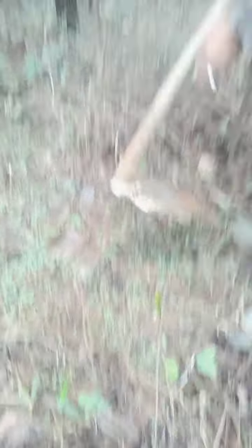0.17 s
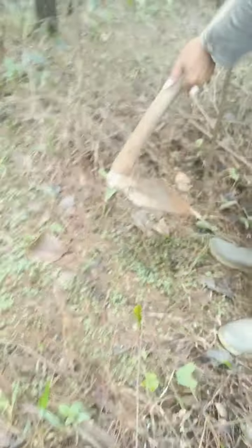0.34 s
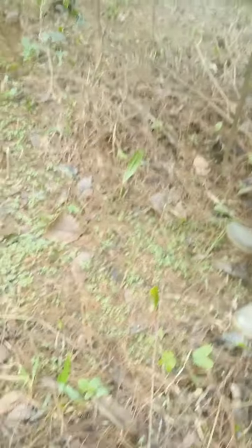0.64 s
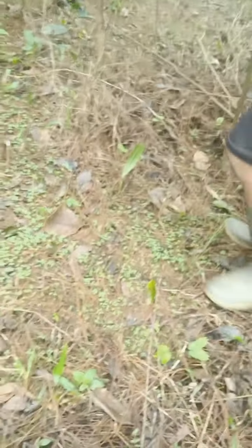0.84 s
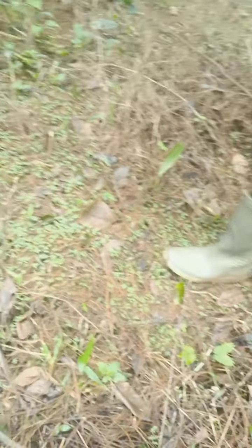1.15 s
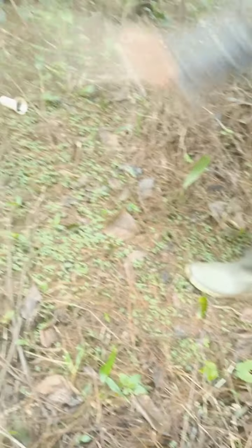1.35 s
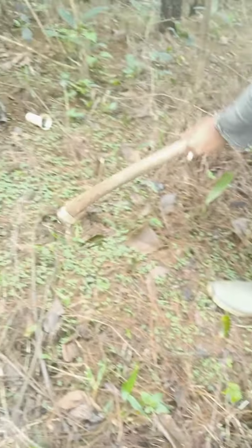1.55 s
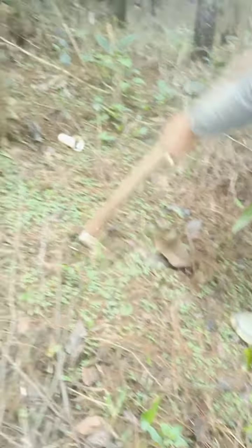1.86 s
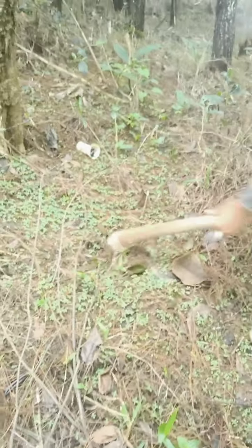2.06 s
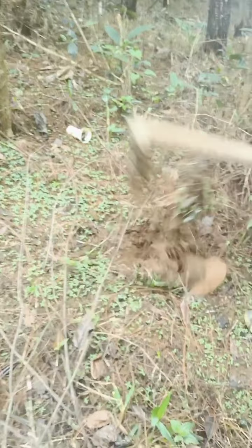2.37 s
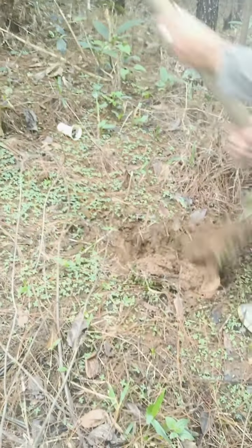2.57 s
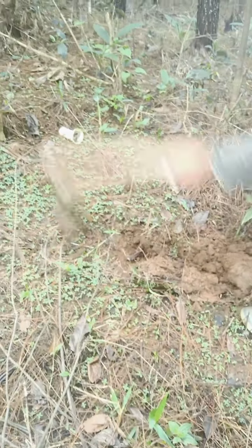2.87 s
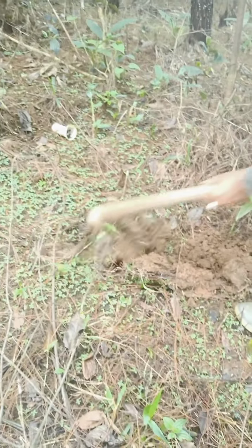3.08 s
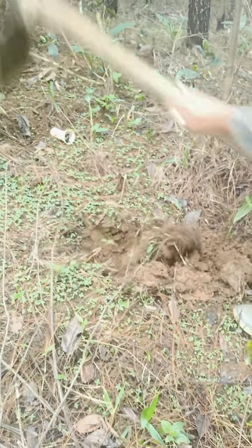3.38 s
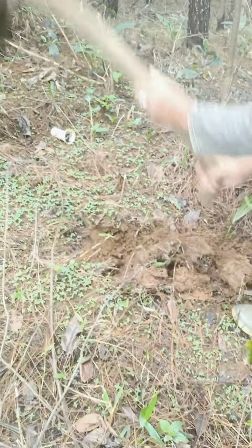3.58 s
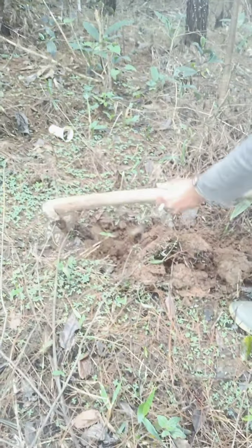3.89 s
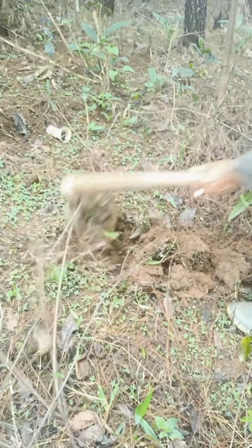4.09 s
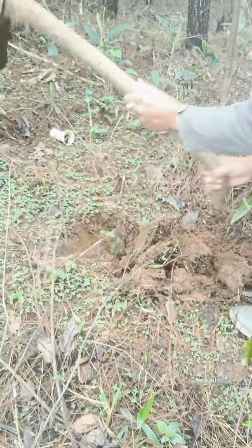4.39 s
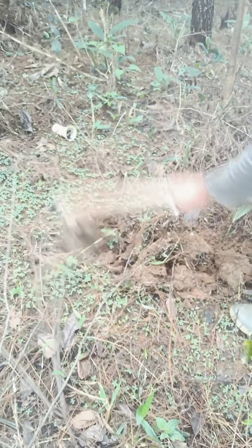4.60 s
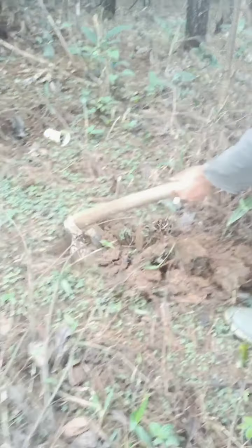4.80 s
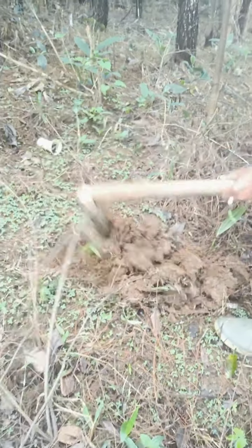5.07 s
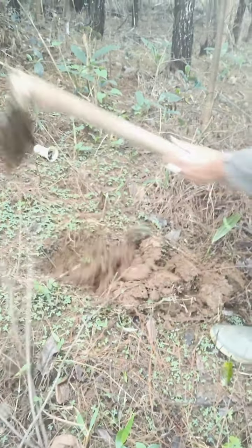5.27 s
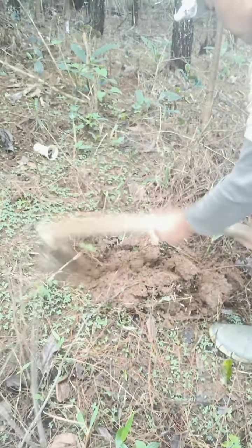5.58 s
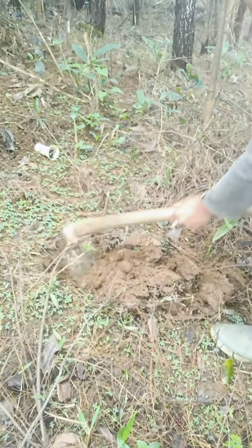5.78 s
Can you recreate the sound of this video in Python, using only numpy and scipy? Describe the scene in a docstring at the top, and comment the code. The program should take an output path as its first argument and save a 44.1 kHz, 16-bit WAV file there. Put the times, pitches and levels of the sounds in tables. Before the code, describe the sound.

Outdoors in quiet woodland, heard close up on a phone. For the first second there is only light, dry rustling of litter with a few tiny twig ticks, over a soft hush and a small engine puttering low and faint in the distance, its hum wavering. A faint thump at 1.0 s and a thin airy swish lead to the first hoe blow at 1.3 s: a loud, sharp crack of grit with a dull thud and brief damped metallic ring. Soil drags and crumbs trickle around 2.0 to 2.5 s. A second heavy, crunchy chop lands at 2.8 s, with pebbles scattering and a snap at 3.4 s. Another gritty chop comes at 3.6 s, then one at 4.55 s with bright twig snaps, the second at 4.65 s. Earth scrapes and slides around 5.0 s. A weaker, crumbly double blow falls at 5.5 s, followed by small ticks and a last fizz of grit at 5.9 s.

```python
"""A hoe chops dry soil in woodland, close to a phone: bursts of cracking grit over dull, ringing thuds.
Between chops, slides of noise and grains drag and trickle, and twigs snap with a few cycles of their own pitch.
A swish of band-limited noise comes before the first full chop.
Far away a small engine putters as a train of puffs, with a wavering low hum, over the steady hush of the wood."""
import sys
import numpy as np
from scipy import signal
from scipy.fft import rfft, irfft, next_fast_len
from scipy.io import wavfile
from scipy.ndimage import uniform_filter1d, map_coordinates

SR = 44100
rng = np.random.default_rng(int(sys.argv[2]) if len(sys.argv) > 2 else 0)


def unload_audio(sound):
    """Save the sound as a 16-bit wav file, at the path given as the first command line argument."""
    columns = np.transpose(np.atleast_2d(sound))
    # keep every value between -1 and 1, then stretch to whole-number steps
    steps = np.round(np.clip(columns, -1, 1) * 32767)
    wavfile.write(sys.argv[1], SR, steps.astype(np.int16))


N = 261954


def amp(db):
    """Gain of a level in dB."""
    return 10 ** (np.asarray(db) / 20)


def unit(x):
    """x at rms 1."""
    return x / np.sqrt(np.mean(x ** 2) + 1e-20)


def along(points, hz):
    """Value at hz of (hz, value) points, interpolated on a log axis."""
    f, v = np.transpose(points)
    return np.interp(np.log(hz + 1), np.log(f + 1), v)


def curves(rows):
    """One value per sample for each column after the time."""
    s, *cols = np.transpose(rows)
    return [np.interp(np.arange(N) / SR, s, c) for c in cols]


def wobble(rate):
    """A smooth random curve, rate knots a second."""
    knots = rng.standard_normal(int(N * rate / SR) + 4)
    return map_coordinates(knots, [np.arange(N) * rate / SR])


def swell(start, length, rise_db, fall_db):
    """Gain that climbs rise_db a second to the start, holds, then drops fall_db a second."""
    t = np.arange(N) / SR
    early, late = np.maximum(start - t, 0), np.maximum(t - start - length, 0)
    return amp(-rise_db * early - fall_db * late)


def filtered(x, response):
    """x times a complex response of frequency."""
    m = next_fast_len(N + 8192)
    return irfft(rfft(x, m) * response(np.fft.rfftfreq(m, 1 / SR)), m)[..., :N]


def resonant(x, modes):
    """x through causal resonances (hz, width_hz, level_db), scaled so that white noise keeps its rms."""
    def shape(f):
        total = 0
        for k, (centre, width, db) in enumerate(modes):
            peak = 1j * f * width / (centre * centre - f * f + 1j * f * width)
            total = total + (-1) ** k * amp(db) * peak  # neighbours have opposite sign
        return total

    power = np.mean(np.abs(shape(np.linspace(0, SR / 2, 4096))) ** 2)
    return filtered(x, shape) / np.sqrt(power)


def spread(pair, alike):
    """Left and right from a shared and an opposed signal, as alike as the table says."""
    def weights(hz):
        turn = np.arccos(np.clip(along(alike, hz), -1, 1)) / 2
        return np.array([np.cos(turn), np.sin(turn)])

    mid, side = filtered(pair, weights)
    return np.array([mid + side, mid - side])


def ports(x):
    """A near sound reaches the two microphone ports with its own colour and lead."""
    # how far the left port leads the right: hz, lead_rad
    port_lead = [(0, 3.5), (3010, -1.5), (6630, -1), (7410, 0), (12800, 5), (13900, 6), (15800, 1),
                 (16400, -9)]
    # left port over right: hz, balance_db
    port_balance = [(60, 13), (150, -4), (380, 5), (950, -4), (2380, 1), (5980, -2), (15000, 8)]

    def pair(hz):
        left = amp(along(port_balance, hz) / 2) * np.exp(.5j * along(port_lead, hz))
        return left ** np.array([[1], [-1]])  # the right port gets the inverse half

    return filtered(x, pair)


def gritty(hollow, crunch, fizz):
    """Three excitations, each ringing its own resonances; all but the fizz lose their treble."""
    # clods and handle: hz, width_hz, relative_db
    hollow_modes = [(508, 440, -7.5), (705, 164, 3.5), (860, 358, 0)]
    # crunching grit: hz, width_hz, relative_db
    crunch_modes = [(1744, 1010, -1), (2550, 770, 8.5), (3970, 560, 2.5), (5310, 1880, 1)]
    # finest grit: hz, width_hz, relative_db
    fizz_modes = [(7680, 5400, -4.5), (11520, 1660, 2), (14100, 2850, 0)]
    coarse = resonant(hollow, hollow_modes) + resonant(crunch, crunch_modes)
    # crumbly earth has little above this corner
    soft = lambda hz: 1 / (1 - (hz / 6800) ** 2 + 1.2j * hz / 6800) ** 2
    return filtered(coarse, soft) + resonant(fizz, fizz_modes)


def hush():
    """The far, steady noise of the wood, shaped in spectrum and width."""
    # spectrum before levelling: hz, relative_db_per_hz
    spectrum = [(18, -21), (30, -3), (48, -11), (91, -5), (332, -7.5), (409, -10.5), (904, -15.5),
                (1270, -19), (2470, -15.5), (3480, -24), (6050, -25), (9730, -41.5), (13700, -31.5),
                (15200, -36.5), (16500, -65)]
    # left-right likeness: hz, likeness
    alike = [(60, 0.52), (180, 0.93), (550, 0.51), (1650, 0.033), (4970, 0.019), (15000, 0.03)]
    noise = filtered(rng.standard_normal((2, N)), lambda hz: amp(along(spectrum, hz)))
    return amp(-58.5 + 0.095 * wobble(3.6)) * unit(spread(noise, alike))


def engine():
    """Far off, one puff for each firing rings the exhaust, with noise gated by the same puffs."""
    # engine speed before a slight unsteadiness: time_s, firings_per_s
    firing = [(0, 34.2), (.7, 35.8), (1.25, 35.1), (1.8, 33.9), (2.6, 36.7), (3.0, 38.2), (3.5, 38.7),
              (4.0, 39.9), (5.4, 37.5), (5.94, 33)]
    # level before the microphone: time_s, level_db
    loudness = [(0, -53), (.8, -57), (2.3, -58), (3.5, -61), (4.8, -62), (5.4, -58.5), (5.94, -62)]
    # exhaust resonances: hz, width_hz, relative_db
    exhaust = [(79.4, 17.4, -2), (137.4, 23.7, -1.5), (200, 78, -8), (331, 33, -2.5)]
    (rate,), (level_db,) = curves(firing), curves(loudness)
    turns = np.cumsum(rate * (1 + .003 * wobble(9))) / SR
    fired = np.diff(np.floor(turns), prepend=0) * amp(rng.standard_normal(N))
    gate = np.exp(-(turns % 1) / 0.57)  # falls from each firing to the next
    rough = unit(resonant(gate * rng.standard_normal(N), exhaust))
    return amp(level_db) * unit(unit(resonant(fired, exhaust)) + 0.3 * rough)


def hum():
    """A low sine tone that wavers in pitch and strength."""
    # tone before its random wavering in level: time_s, pitch_hz, level_db
    tone = [(0, 86.3, -62), (1.2, 85, -67), (1.85, 97, -63), (2.05, 86, -66.5), (3.8, 95.1, -75),
            (4.7, 89, -68), (5.94, 87, -64)]
    hz, level_db = curves(tone)
    strength = np.sqrt(2) * amp(level_db + 1.1 * wobble(9))
    return strength * np.sin(2 * np.pi * np.cumsum(hz) / SR)


def ticks():
    """Twigs and pebbles: one sharp snap, a few cycles of the piece's own pitch and a wisp of grit."""
    # single pieces, parts relative to level: start_s, level_db, pitch_hz, crunch_db, hollow_db, fizz_db
    pieces = [(0.0516, -39.5, 2760, 0.5, -7, -16), (0.1162, -37.5, 5170, -1.5, -5, -18),
              (0.6664, -41, 2600, 4, -14, -1), (0.7612, -37.5, 2290, -5, -22, -19),
              (1.9111, -42.5, 2500, -12, -5, -21), (1.9764, -32, 2820, -6, -20, -26),
              (1.9816, -36.5, 2450, 1, -21, -15), (2.615, -30.5, 2180, 3.5, -22, -11),
              (2.787, -25.5, 2820, -0.5, -7.5, -12), (3.243, -28, 2300, 0.5, -10, -1),
              (3.4115, -18.5, 2420, -1.5, -13, -7), (3.4164, -34, 2550, -3, -20, -22),
              (3.454, -45, 2070, -2, -10, -4), (3.838, -43.5, 940, 2.5, -5, -20),
              (3.879, -46, 1030, 2, -3, -20), (3.9005, -40, 2500, -1, -8, -16),
              (3.9313, -38, 2020, 8, 0, -10), (4.1918, -37.5, 2400, 4.5, -22, -16),
              (4.5517, -11, 1950, -17, -19, -33), (4.6, -39, 2400, 2, -15, -22),
              (4.643, -45, 2220, -2, -3, -29), (4.65, -10.5, 2050, -8.5, -12, -33),
              (4.668, -45, 2200, -5, -1, -25), (4.7052, -40, 2000, -2, 5, -24),
              (5.6575, -39.5, 2470, 0, -11, -14), (5.8157, -44.5, 2730, 2, -10, -15),
              (5.8494, -39.5, 1450, -13, 6, -22), (5.8613, -32.5, 2730, -9, 1, -28)]
    wisp_t60_s, pan_db = .012, 0.5  # pan: left over right
    ring_cycles, sharper_per_db = 28, .022  # cycles to fall 60 dB at -35 dB; share lost per dB louder
    drive, rings = np.zeros((3, 1, N + SR)), np.zeros((1, N + SR))
    t = np.arange(SR // 16) / SR
    fade = amp(-60 * t / wisp_t60_s)
    for s, db, hz, crunch_db, hollow_db, fizz_db in pieces:
        wisp = 0.49 * rng.standard_normal(len(t)) * fade
        wisp[0] = 0.64  # the snap itself
        parts = amp([hollow_db, crunch_db, fizz_db])[:, None, None]
        drive[:, :, round(s * SR):][..., :len(t)] += parts * amp(db) * wisp
        cycles = ring_cycles * np.clip(1 - sharper_per_db * (db + 35), .2, 2)
        decay = 0.85 * amp(db - 60 * t * hz / cycles)
        ring = decay * (1 - np.exp(-t / 0.00015)) * np.sin(2 * np.pi * hz * t)
        rings[:, round(s * SR):][:, :len(t)] += ring
    pan = amp(np.array([[pan_db], [-pan_db]]) / 2)
    return pan * ports(gritty(*drive[..., :N]) + rings[:, :N])


def patchy(x):
    """x with brief random patches of louder and softer gain across time and frequency."""
    z = signal.stft(x, nperseg=256)[2]
    field = rng.standard_normal(z.shape[1:])
    for axis in (0, 1):  # frequency, then time
        field = uniform_filter1d(field, size=6, axis=axis)
    return signal.istft(z * amp(3 * unit(field)), nperseg=256)[1][:, :N]


def soil():
    """Uneven grains patter over a finer slide of dust; about 120 sharper crumb clicks a second stand out."""
    # soil and litter on the move: start_s, length_s, crunch_db, hollow_db, fizz_db
    # (the last two relative to the crunch)
    slides = [(0.155, 0.53, -59, -8, -10.5), (0.71, 0.26, -62.5, -11, -9.5),
              (1.377, 0.015, -49.5, -4.5, -17), (1.522, 0.095, -52, -6.5, -14),
              (2.031, 0.13, -55, -9, -11.5), (2.296, 0.06, -52, -11.5, -21), (2.321, .01, -47.5, -6.5, -12),
              (2.42, 0.14, -55, 3, -33), (2.524, 0.034, -44.5, -8.5, -18.5), (2.608, 0.5, -57, -10.5, -12),
              (3.184, .14, -64.5, -16, -12), (3.39, .01, -60.5, -1, -19), (3.69, .02, -56, -12, -8),
              (3.837, 0.15, -58.5, -3, -15), (4.02, 0.26, -57, -12.5, -11), (4.61, 0.044, -60.5, -10, -14),
              (4.819, 0.065, -54, -9.5, -13.5), (5.002, 0.13, -54, -9, -12), (5.22, 0.2, -60, -10, -10),
              (5.5, 0.041, -58, -4, -11.5), (5.79, .08, -63.5, -3.5, -7), (5.92, .05, -53, -16, -25)]
    # left-right likeness of the patter: hz, likeness
    alike = [(300, 1), (700, 0.15), (2500, 0.12), (7000, 0.04), (15000, 0.033)]
    gather_db_per_s, settle_db_per_s = 139, 130
    # steady rate; crumbs swell and fade in level with the slides
    crumbs_per_s, crumb_db, crumb_spread_db = 120, 12, 2
    power = 0
    for s, length, db, hollow_db, fizz_db in slides:
        parts = amp(db + np.array([[hollow_db], [0], [fizz_db]]))
        power = power + (parts * swell(s, length, gather_db_per_s, settle_db_per_s)) ** 2
    hollow, crunch, fizz = np.sqrt(power)
    falls = rng.random(N) < 600 / SR * amp(3 * wobble(14))  # about 600 grains a second
    sizes = falls * amp(np.minimum(3.5 * rng.exponential(size=N), 12))
    grains = signal.lfilter([1], [1, -np.exp(-1 / (0.00051 * SR))], sizes)
    clumps = amp(1.3 * wobble(40))
    patter = unit(1.34 + 0.41 * grains) * clumps * spread(rng.standard_normal((2, N)), alike)
    crumb_sizes = amp(crumb_db + crumb_spread_db * rng.exponential(size=(2, N)))
    crumbs = (rng.random(N) < crumbs_per_s / SR) * crumb_sizes
    patter = patter + crumbs * rng.choice([-1, 1], N)
    return patchy(gritty(patter * hollow, patter * crunch, patter * fizz))


def thuds():
    """A push with a rough tail rings the soft ground, the cut clod knocks at its own pitch, the blade rings."""
    # the blade's weight lands: start_s, level_db, deep_db (relative to level), knock_hz, knock_db, blade_db
    blows = [(1.029, -44, -18, 403, -53, -59), (1.318, -24.5, 3, 896, -18, -15.5),
             (2.812, -25, -4, 787, -22, -20), (3.636, -25, -8, 748, -28, -36),
             (4.556, -32, -20, 790, -28, -40), (5.473, -36.5, -5, 934, -46, -48),
             (5.504, -39.5, -4, 398, -32, -44), (5.564, -53, -14, 710, -42.5, -66),
             (5.847, -48, -23, 423, -39, -57)]
    # soft ground: hz, width_hz, relative_db
    ground = [(92, 54, -4), (165, 54, 4.5), (313, 76, 5)]
    # the ground under a heavy blow: hz, width_hz, relative_db
    deep = [(73.5, 31, 3), (122, 83, 6.5)]
    # steel damped by soil, level before a random change at each blow: hz, relative_db, t60_s
    blade_modes = [(1555, 3.5, 0.043), (1785, -9, 0.03), (2226, 17, 0.017), (2540, 18, 0.025)]
    tail_t60_s, knock_t60_s, blade_attack_s = 0.12, 0.063, 0.0026  # the blade's ring builds as it bites
    push, knocks = np.zeros((2, N + SR)), np.zeros(N + SR)
    t = np.arange(SR // 4) / SR
    for s, db, deep_db, knock_hz, knock_db, blade_db in blows:
        rough_tail = 0.82 * rng.standard_normal(len(t)) * amp(-60 * t / tail_t60_s)
        blow = 1.71 * np.exp(-t / 0.00043) + rough_tail
        push[:, round(s * SR):][:, :len(t)] += amp(db - 7.0 + np.array([[0], [deep_db - 2]])) * blow
        pair = np.sin(2 * np.pi * knock_hz * t) + 0.97 * np.sin(2 * np.pi * .77 * knock_hz * t)
        knock = amp(knock_db - 3.5 - 60 * t / knock_t60_s) * (1 - np.exp(-t / 0.0012)) * pair
        blade = 0
        for hz, level, t60 in blade_modes:
            decay = amp(level + rng.normal(0, 4.2) - 60 * t / t60)
            blade = blade + decay * np.sin(2 * np.pi * (hz * t + rng.random()))
        ring = amp(blade_db) * (1 - np.exp(-t / blade_attack_s)) ** 2 * blade
        knocks[round(s * SR):][:len(t)] += knock + ring
    low = resonant(push[0, :N], ground) + resonant(push[1, :N], deep)
    return low + ports(knocks[None, :N])


def swish():
    """Air sheds off the falling blade in a few narrow bands, unsteady in level."""
    start_s, length_s, level_db = 1.057, 0.206, -56.5
    rise_db_per_s, stop_db_per_s = 180, 608
    shape = swell(start_s, length_s, rise_db_per_s, stop_db_per_s)
    # hz, width_hz, relative_db
    band = [(2120, 200, 2.5), (2530, 770, -2), (3230, 460, -3.0), (3670, 210, -7.5), (5860, 160, -12.0)]
    return shape * amp(level_db + wobble(29.4)) * resonant(rng.standard_normal((2, N)), band)


def cracks():
    """Each crack is a burst of breaking grit; the hollow part lasts longer, the fizz is shorter."""
    # soil and roots, parts relative to level: start_s, level_db, hollow_db, fizz_db
    breaks = [(1.303, -41, -1, -11), (1.3127, -17.5, -11, -23), (1.3185, -15, 2, -36),
              (1.322, -4.5, -18.5, -45), (1.3344, -36, -19, -1), (2.006, -32, -11, -12),
              (2.0706, -42, -9, -25), (2.3204, -26.5, -8, -22), (2.8057, -21.5, -4, -18),
              (2.813, -5.5, -4.5, -17.5), (2.8254, -19.5, -33, -35), (2.8355, -20.5, -10.5, -25),
              (3.6118, -29, -11, -25), (3.6251, -12, -14, -19), (3.634, -10.5, -7.5, -8.5),
              (3.639, -19, -5, -24), (3.65, -25, -23, -13), (4.5296, -23.5, -11, -42),
              (4.5427, -20.5, -25, -8), (4.5514, -14, -2, -29), (4.558, -23.5, -3.5, -31),
              (4.5657, -27, -17, -16), (4.577, -29.5, -32, -5), (4.9847, -37.5, -10, -20),
              (5.0182, -31, -7, -15), (5.042, -27.5, -16, -14), (5.1248, -34, -14, -9),
              (5.244, -38.5, -12, -10), (5.462, -31.5, -3.5, -26), (5.471, -24, -16, -11),
              (5.476, -24, -19, -12), (5.487, -35, -6, -20), (5.4943, -23.5, -3.5, -29),
              (5.5022, -24.5, -10, -14), (5.513, -33, -20, -12), (5.531, -42, -18, -9),
              (5.898, -39, -9, -12), (5.9089, -28.5, -28, -0.5), (5.926, -29.5, -30, -9)]
    # left-right likeness of the bursts: hz, likeness
    alike = [(300, 0.82), (700, 0.99), (2500, 0.86), (7000, 0.19), (15000, 0.29)]
    ring_t60_s, sharper_per_db = 0.035, 0.0124  # at -19.5 dB; share it shortens for each dB louder
    attack_s, crest_db = 0.00078, 5  # crest: allowance for a peak over its rms
    grit, t = np.zeros((3, 1, N + SR)), np.arange(SR // 8) / SR
    for s, db, hollow_db, fizz_db in breaks:
        t60 = np.clip(ring_t60_s * (1 - sharper_per_db * (db + 19.5)), .003, .2)
        life = t60 * np.array([1.3, 1, .8])[:, None, None]  # hollow, crunch, fizz
        size = amp(db + np.array([hollow_db, 0, fizz_db]) - crest_db)[:, None, None]
        burst = size * amp(-60 * t / life) * (1 - np.exp(-t / attack_s))
        grit[:, :, round(s * SR):][..., :len(t)] += burst
    noise = spread(rng.standard_normal((2, N)), alike)
    return ports(gritty(*(grit[..., :N] * noise)))


def trees(x):
    """A short scatter off trunks and undergrowth: decaying noise, separate for left and right."""
    t = np.arange(SR // 4) / SR
    tail = rng.standard_normal((2, len(t))) * amp(-60 * t / 0.17)
    tail = tail / np.linalg.norm(tail[0])
    return signal.fftconvolve(x.mean(axis=0)[None], tail, axes=1)[:, :N]


def scene():
    """Everything around the phone; the cracks and ticks also scatter off the trees."""
    near = cracks() + ticks()
    return near + amp(-16) * trees(near) + thuds() + soil() + swish() + engine() + hum() + hush()


def record(dry):
    """The phone cuts the deep bass, thins the top and keeps nothing above its band limit."""
    band_limit_hz = 16400
    bass = lambda hz: (1j * hz / (1j * hz + 55)) ** 2
    top = lambda hz: np.where(hz > 15500, amp(-18), 1) * (hz < band_limit_hz)
    return filtered(dry, lambda hz: bass(hz) * top(hz))


dry = scene()
out = record(dry)
unload_audio(out)
```